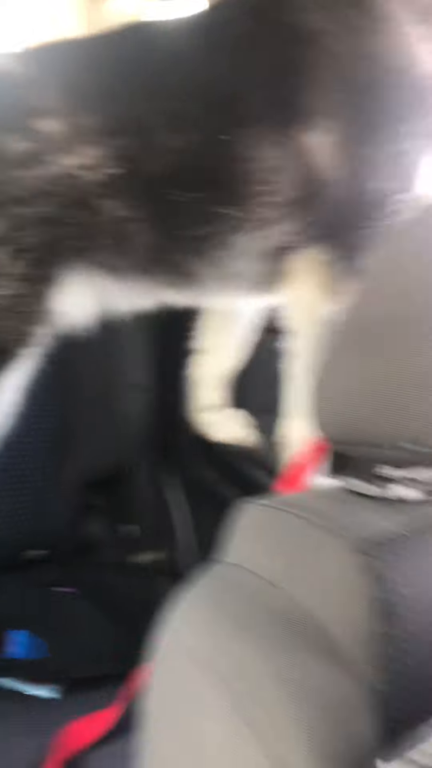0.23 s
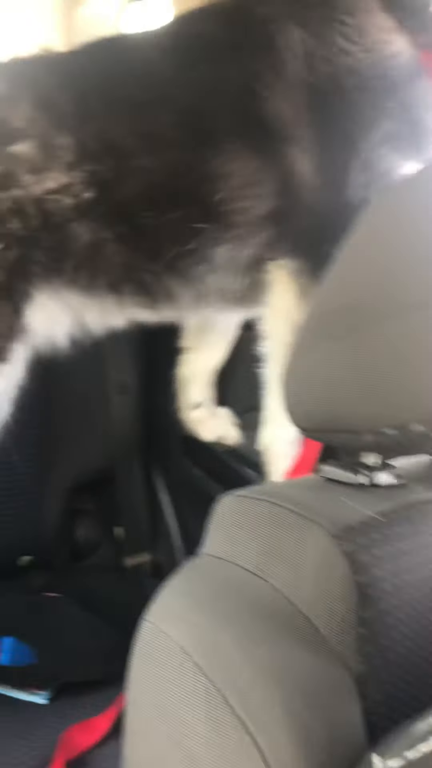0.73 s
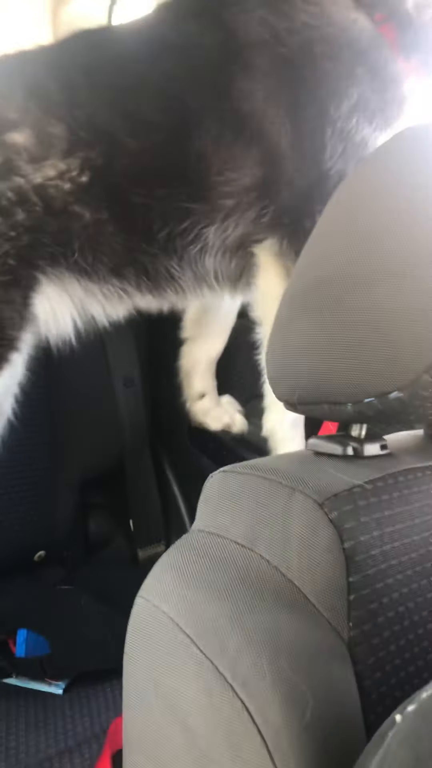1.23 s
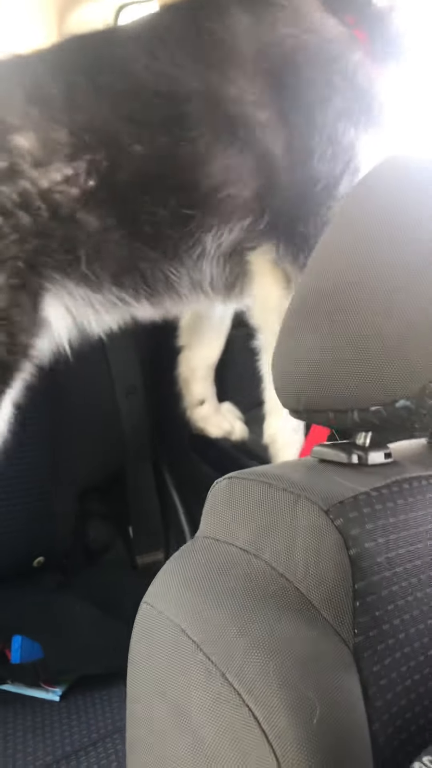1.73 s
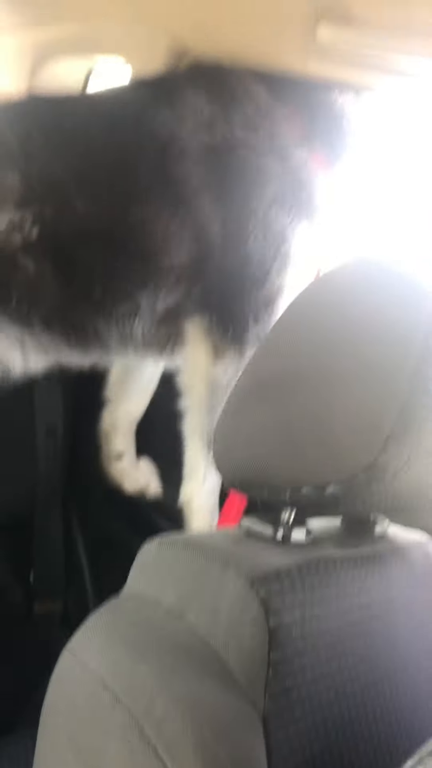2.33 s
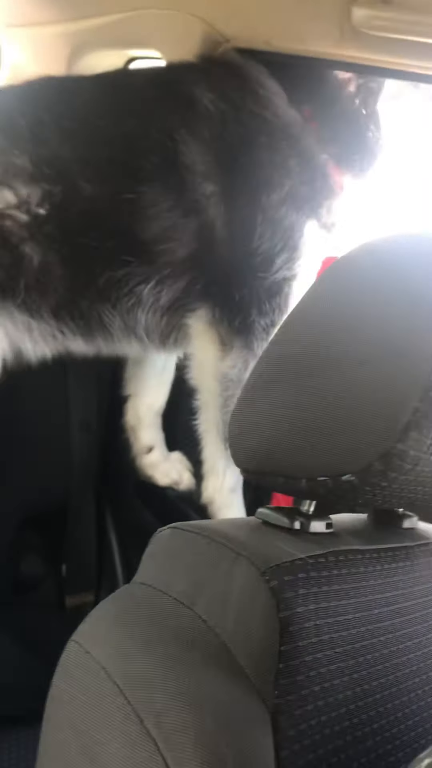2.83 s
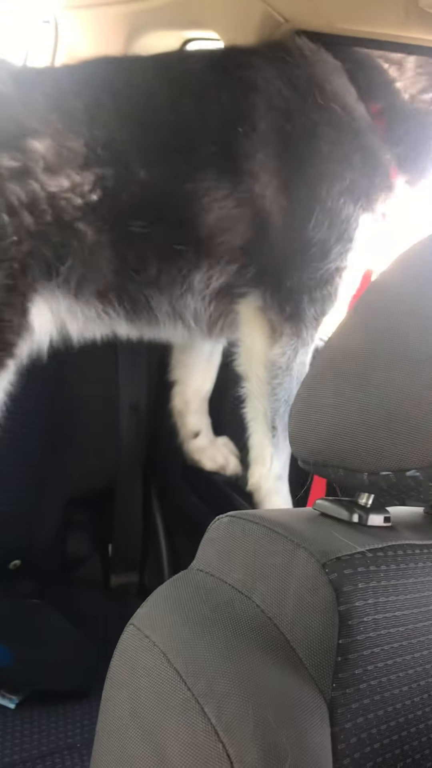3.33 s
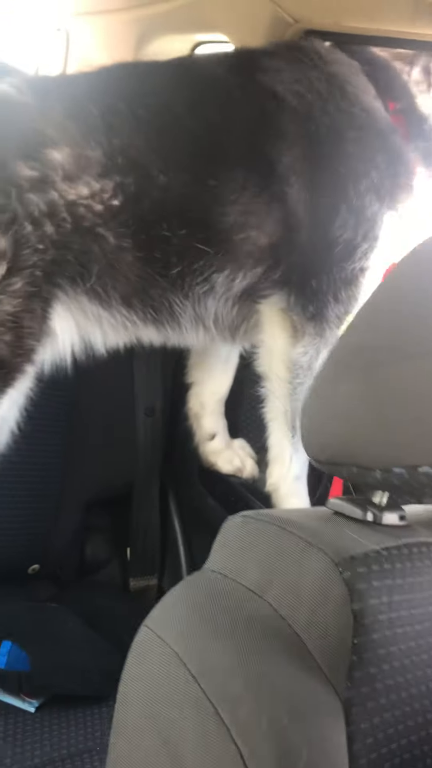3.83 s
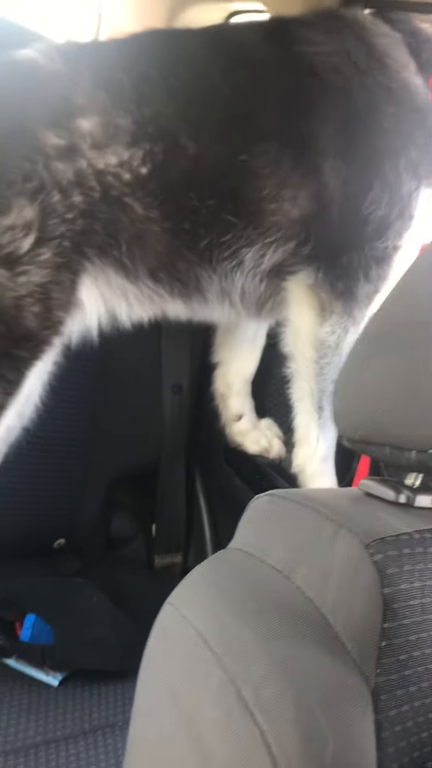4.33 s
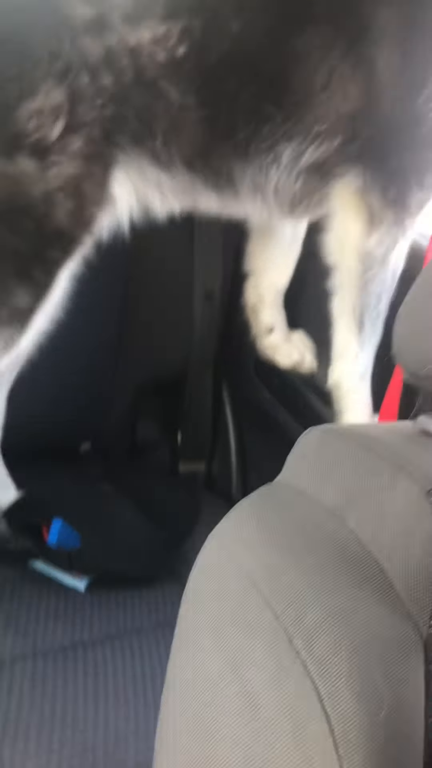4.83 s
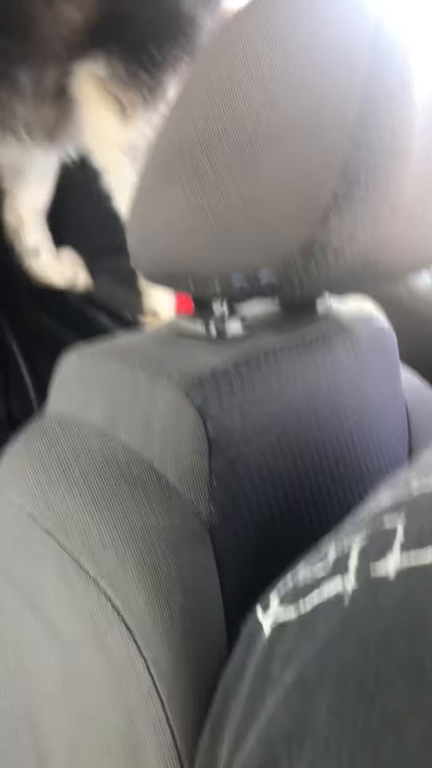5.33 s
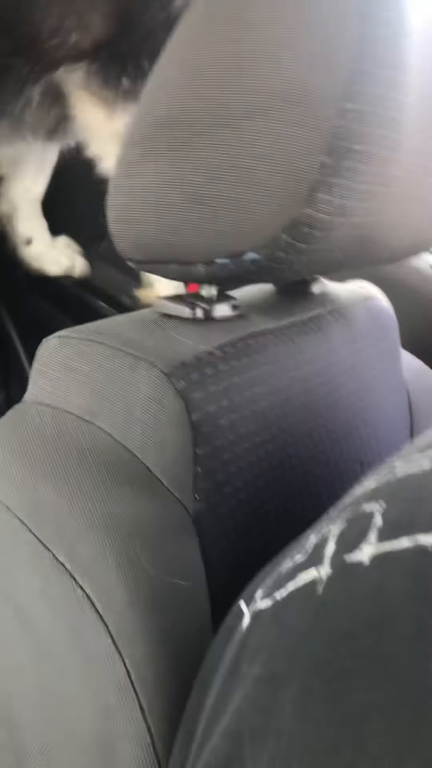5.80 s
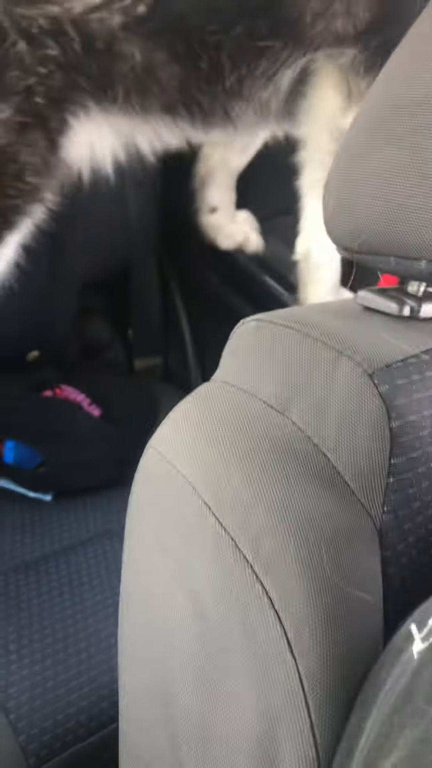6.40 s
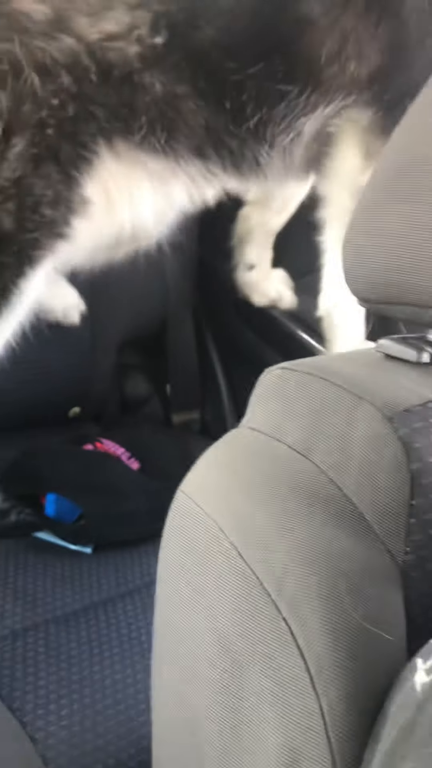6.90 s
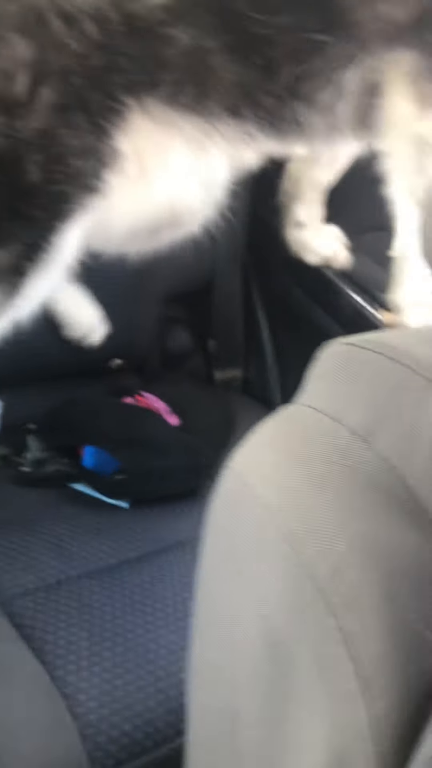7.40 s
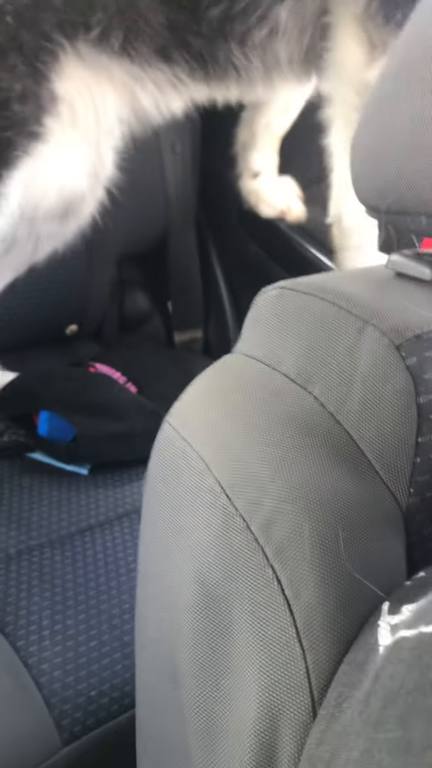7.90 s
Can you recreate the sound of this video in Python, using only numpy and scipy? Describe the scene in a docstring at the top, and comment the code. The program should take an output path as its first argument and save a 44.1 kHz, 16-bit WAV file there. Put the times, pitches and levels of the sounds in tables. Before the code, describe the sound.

A car's cabin rumble eases, then booms as it accelerates, while fur brushes the seat and plastic buckles knock close by.

```python
"""Dog in a moving car

Microphone between the seats. The car slows on a rough road, then pulls away, its engine booming in
the cabin. Tyres rumble and hiss with the speed, and a wheel thuds over bumps. Close by, a dog stands
on the back seat: fur rustles on cloth, and harness and belt fittings click and knock."""
import sys
import numpy as np
from scipy import signal
from scipy.fft import rfft, irfft, next_fast_len
from scipy.io import wavfile
from scipy.ndimage import map_coordinates

SR = 44100
rng = np.random.default_rng(int(sys.argv[2]) if len(sys.argv) > 2 else 0)


def digitize_waveform(pressure):
    """Quantize a signal to 16-bit integers and store it at the path in sys.argv[1].

    Rows of a 2-D input are taken as channels; values are limited to [-1, 1].
    """
    field = np.atleast_2d(pressure).T
    bounded = np.clip(field, -1, 1)
    quanta = np.round(bounded * 32767).astype(np.int16)
    wavfile.write(sys.argv[1], SR, quanta)


N = 359415
TIME = np.arange(N) / SR

# engine firing rate: t/s, f/Hz
FIRING_RATE = [(0,40.53),(1.2,41.92),(1.65,38.84),(3,35.59),(4.75,33.8),(5.42,35.5),(5.8,45.13),(6.03,52.23),(6.25,55.3),(6.55,57.3),(6.85,64.3),(7.2,66.95),(7.6,70.65),(8.15,75.53)]
# throttle pressed: start/s, end/s, depth/0-1
THROTTLE = [(0.293,.65,1),(1.047,1.4,0.64),(5.45,8.5,0.89)]
# engine overtones: multiple of the firing rate, relative level/dB
ENGINE_ORDERS = [(1.5,-18.5),(2,-2.5),(2.5,-27),(3,-12.5),(3.5,-15.5),(4,-16),(4.5,-19.5),(5,-22),(6,-25),(7,-28.5)]
# cabin air resonances that lift a passing engine tone: f/Hz, half width/Hz, lift/dB
CABIN_MODES = [(56.8,5.9,4.5),(133.8,8,6.5),(168.8,5.6,12),(271,10,3)]

# road speed: t/s, share of the opening speed
ROAD_SPEED = [(0,0.99),(1.9,0.91),(3,0.67),(4,0.5),(5.1,0.4),(6.2,0.47),(7.2,0.58),(8.15,0.57)]
# rough stretches: t/s, half length/s, shake lift/dB, panel lift/dB
ROUGH_ROAD = [(.2,0.28,2,-1),(1.4,0.24,7,4.5),(2.046,0.15,1,3.5),(2.593,0.32,9,4.5),(3.456,0.21,4,2.5),(5.147,0.16,-1,1.5),(5.75,0.83,8.5,0.5),(7.1,0.6,3.5,2)]
# dips that set the body booming, and bumps under a wheel: t/s, half length/s, level/dB
DIPS = [(.55,0.2,-30.5),(2.05,0.16,-25),(2.3,0.25,-29),(2.6,0.14,-25.5)]
BUMPS = [(.29,0.025,-35.5),(1.04,0.031,-40),(1.24,0.046,-38),(1.435,0.014,-46),(2.04,0.021,-38),(2.087,0.013,-28),(3.42,0.043,-43.5)]
# road noise spectra, from inside the car: f/Hz, relative level/dB
SUSPENSION_SPECTRUM = [(15,-39),(24,-10.5),(30,-2),(42,-10),(52,4),(63,-6),(80,-10.5),(130,-33.5),(300,-83)]
PANEL_SPECTRUM = [(45,-29.5),(70,-0.5),(90,-1.5),(104,2.5),(118,-3),(135,-5.5),(165,-11),(260,-36),(600,-87)]
BODY_SPECTRUM = [(110,-36),(160,-1),(185,6),(230,-3.5),(270,-3.5),(350,-9.5),(450,-19),(700,-32.5),(2000,-90)]
TYRE_SPECTRUM = [(200,-14.5),(450,2),(590,1.5),(760,0),(1000,-2),(1150,-1.5),(1350,-2.5),(1650,-7),(2500,-17),(4000,-30),(8000,-34.5),(16000,-43)]
THUD_SPECTRUM = [(50,-18),(100,7.5),(180,-7),(260,5.5),(400,-3),(600,-9),(850,-13),(1300,-32),(4000,-75.5)]
# whining bands of the tread: f/Hz, width/Hz, level against the hiss/dB
TREAD_BANDS = [(503,35,-16.5),(742,40,-14),(1327,70,-21)]

# steady rustle as the dog grows restless: t/s, level/dB
RESTLESSNESS = [(0,-72),(4.6,-69),(5.8,-60),(6.2,-65),(6.7,-59),(7.05,-59.5),(7.37,-54.5),(7.56,-57.5),(8.15,-63.5)]
# fur brushes on cloth: t/s, half length/s, relative level/dB
FUR_STROKES = [(.39,0.15,-62),(.69,0.033,-56),(1.08,0.058,-61),(1.48,0.18,-58.5),(2.21,0.059,-60.5),(2.48,0.083,-63),(3.04,0.052,-64),(3.6,0.033,-70),(4.97,0.053,-62.5),(5.39,.024,-57),(5.885,0.012,-50.5),(6.52,0.023,-56),(6.78,0.012,-46.5),(6.87,0.027,-51.5),(7.44,0.023,-47.5),(7.485,0.02,-40)]
# a strap slides, and the seat is scuffed: t/s, half length/s, level/dB
STRAP_SLIDES = [(5.25,0.0055,-67),(5.38,0.039,-46.5),(5.595,0.0053,-33.5),(5.608,.003,-37),(7.49,0.015,-53),(7.703,0.014,-43)]
SEAT_SCUFFS = [(4.825,0.017,-52.5),(5.6,0.19,-51),(6.8,0.03,-51.5)]
# rubbing spectra, close by: f/Hz, relative level/dB
CLOTH_SPECTRUM = [(300,-19.5),(750,9.5),(1500,-3),(2200,3),(3000,2),(4300,2),(5000,-1.5),(6600,-1),(7800,-5.5),(9500,-4),(10400,-10.5),(11500,-5.5),(15800,-11.5)]
WEBBING_SPECTRUM = [(400,2),(880,1.5),(1200,-4.5),(1850,3),(2200,-5.5),(2600,-0.5),(3300,-2.5),(4300,-8),(8000,-27.5),(16000,-33.5)]
SEAT_SPECTRUM = [(300,-21.5),(550,-8.5),(800,-3),(1100,-8),(2000,-18),(6000,-39)]

# hollow contacts: t/s, relative level/dB, clack/dB, most excited f/Hz, fall around it/dB per octave
KNOCKS = [(1.42,-36.5,7,1388,10),(4.365,-43,5,1872,7),(4.522,-43,0,2430,14),(5.155,-35.5,-16,2447,25),(5.259,-32.5,-6,2080,10),(5.346,-30,-20,2487,22),(5.365,-29,-21,2400,12),(5.511,-24,-10,1660,10),(5.542,-23,-4,1640,14),(5.548,-22,-5,1870,25),(5.555,-12.5,-15,1900,28),(5.565,-22,-3,1670,20),(5.576,-4.5,-21,2440,6.5),(5.668,-31.5,-24,2220,3),(7.1613,-23.5,-12,1820,12),(7.254,-22.5,-1,1660,6),(7.507,-22,-5,1800,6),(7.687,-26,-22,1872,10),(7.702,-25,-24,2400,8),(7.763,-30,-16,2380,26)]
# brief crack of a knock: f/Hz, relative level/dB
CRACK_SPECTRUM = [(400,-20),(1000,-9),(1600,4),(2600,3),(4300,0),(6000,-5),(8300,-7.5),(10500,-16),(16000,-23)]
# sharp contacts, all levels relative: t/s, level/dB, low band/dB, top band/dB
CLICKS = [(0.0783,-43,1,-24),(0.109,-41,6,-26),(0.2472,-34,11,-11),(.2809,-37,9,-22),(.313,-30.5,9,-14),(.456,-35,12,-20),(0.527,-30,8.5,-15),(.596,-41,4,-16),(0.7552,-38.5,10,-18),(.8892,-43,5,-26),(.9264,-43,8,-26),(1.6172,-30.5,-0.5,-11),(2.966,-37,12.5,-25),(5.2444,-38.5,8,-5),(5.3155,-30,-8,-24),(5.4613,-14.5,-9.5,-13),(5.614,-24,-6,-10.5),(5.696,-40,-3,-21),(5.7297,-19,2,-10),(5.9385,-35.5,-1,-20),(5.963,-30.5,0,-17),(6.0028,-36.5,3,-3.5),(6.298,-37,-5,-27),(6.55,-31,-4,-14),(6.5834,-28.5,-6.5,-11),(7.1618,-31.5,-10,-4),(7.528,-34,-1,-30),(7.713,-36,-21,-16)]
# modes of the plastic fitting and the metal ring: f/Hz, relative level/dB, t60/s
PLASTIC_MODES = [(900,-6,.06),(1320,-10,0.048),(1645,-2.5,0.038),(1893,0,0.027),(2070,-8,.03),(2330,-16,.025),(2445,-1,0.032),(2610,3.5,0.015),(2910,-14,.05),(3440,-10,.035),(4200,-19,0.023),(4300,-23,0.022),(5430,-13,0.023),(6600,-17,0.02)]
METAL_MODES = [(6595,-3,.09),(8830,-1,0.093),(11880,-10,.07)]


def engine(idle_db=-32.5, load_db=10, lag_s=0.13, idle_hz=35, overtone_db=-48.5, db_per_octave=12):
    """From the cabin: the firing tone swells with the throttle; uneven cylinders add wavering orders."""
    firing_hz = curve(FIRING_RATE)
    phase = 2 * np.pi * np.cumsum(firing_hz) / SR
    pedal = sum(depth * ((TIME > start) & (TIME < end)) for start, end, depth in THROTTLE)
    pole = np.exp(-1 / (lag_s * SR))
    load = signal.lfilter([1 - pole], [1, -pole], pedal)
    lift_db = lambda hz: sum(db * bell(hz, mode_hz, half) for mode_hz, half, db in CABIN_MODES)
    boom = amp(idle_db + load_db * load + lift_db(firing_hz) + 1.5 * wobble(21)) * np.sin(phase)
    overtones = np.zeros(N)
    for order, db in ENGINE_ORDERS:
        gain = amp(db + lift_db(order * firing_hz) + 2.5 * wobble(9))
        overtones += gain * np.sin(order * phase + rng.uniform(0, 2 * np.pi))
    rev_gain = amp(overtone_db + db_per_octave * np.log2(firing_hz / idle_hz))
    return np.sqrt(2) * (boom + rev_gain * overtones)


def road(boom_hz=51, body_share=0.11):
    """Underneath: the road shakes the suspension, drums on the panels and hisses under the tread."""
    shake_lift_db = sum(db * bell(TIME, s, half) for s, half, db, _ in ROUGH_ROAD)
    panel_lift_db = sum(db * bell(TIME, s, half) for s, half, _, db in ROUGH_ROAD)
    shake = amp(speed_db(-31, per_doubling=3.5) + shake_lift_db) * noise(SUSPENSION_SPECTRUM)
    boom_phase = 2 * np.pi * np.cumsum(boom_hz + 2 * wobble(14.9)) / SR  # a wandering body resonance
    boom = swells(DIPS) * np.sqrt(2) * np.sin(boom_phase)
    panels = amp(speed_db(-29.5, per_doubling=3.5) + panel_lift_db) * noise(PANEL_SPECTRUM)
    drone_db = speed_db(-34, per_doubling=5.5) + body_share * panel_lift_db + 1.38 * wobble(9)
    drone = amp(drone_db) * noise(BODY_SPECTRUM)
    hiss_db = speed_db(-46, per_doubling=10) + 0.84 * wobble(16)
    tyres = amp(hiss_db) * (noise(TYRE_SPECTRUM) + tread_whine())
    thuds = swells(BUMPS) * noise(THUD_SPECTRUM)
    return shake + boom + panels + drone + tyres + thuds


def tread_whine(flutter_db=5):
    """The tread sings faintly in a few narrow, fluttering bands."""
    out = np.zeros(N)
    for centre, width, db in TREAD_BANDS:
        gain = amp(db + flutter_db * wobble(7.9))
        out += gain * unit(filtered(rng.standard_normal(N), lambda hz: bell(hz, centre, width / 2)))
    return out


def rubbing(fibre_db=2, slip_db=3, grip_db=1.15, fidget_db=1.9, catches_per_s=45, catch_s=0.0037):
    """Back seat, close: fur brushes cloth in fine grains and catches; a strap slides in coarser slips."""
    pressure = amp(curve(RESTLESSNESS) + fidget_db * wobble(9.7)) + amp(-5) * swells(FUR_STROKES)
    pressure *= amp(grip_db * wobble(35))
    fibres = unit(noise(CLOTH_SPECTRUM) * amp(fibre_db * wobble(600)))
    snags = (rng.random(N) < catches_per_s / SR) * rng.random(N)
    snag_decays = signal.lfilter([1], [1, -np.exp(-1 / (catch_s * SR))], snags)
    catches = amp(-10) * unit(snag_decays * noise(WEBBING_SPECTRUM))
    strap = swells(STRAP_SLIDES) * unit(noise(WEBBING_SPECTRUM) * amp(slip_db * wobble(250)))
    scuffs = swells(SEAT_SCUFFS) * noise(SEAT_SPECTRUM)
    return pressure * (fibres + catches) + strap + scuffs


def knocks(level_db=-8.5, attack_s=0.0011, crack_t60=0.036, clack_t60=0.055, grip_s=0.0085):
    """Close: a hollow plastic fitting rings differently with each knock, over a crack and a low clack."""
    out, t = np.zeros(N), np.arange(SR // 6) / SR
    onset = 1 - np.exp(-t / attack_s)
    grip = amp(-7.5 * (1.5 - np.exp(-t / grip_s)))  # the strap soon soaks up the first swing
    clack_spectrum = [(400, -29), (900, -3.5), (1600, -23), (4000, -45)]
    for s, db, clack_db, centre_hz, db_per_octave in KNOCKS:
        # the point of contact favours the modes near one frequency
        fall_db = lambda hz: db_per_octave * abs(np.log2(hz / centre_hz))
        ring = np.zeros(len(t))
        for hz, mode_db, t60 in PLASTIC_MODES:
            strength_db = mode_db - fall_db(hz) + rng.normal(0, 1)
            ring += amp(strength_db - 60 * t / t60) * np.sin(2 * np.pi * hz * t + rng.normal(0, 1))
        colour = [(hz, band_db - 0.29 * fall_db(hz)) for hz, band_db in CRACK_SPECTRUM]
        crack = amp(-12.5 - 60 * t / crack_t60) * noise(colour, len(t))
        clack = amp(clack_db - 60 * t / clack_t60) * noise(clack_spectrum, len(t))
        add(out, s, amp(db + level_db) * onset * (2 * grip * ring + crack + clack))
    return out


def clicks(contacts, level_db=-7, attack_s=0.00073, snap_db=6, snap_t60=0.0049, ring_t60=0.062):
    """Small hard contacts: a brief snap, then dense, quickly damped modes, heard as coloured noise."""
    out, t = np.zeros(N), np.arange(SR // 6) / SR
    onset = 1 - np.exp(-t / attack_s)
    fade = amp(-60 * t / ring_t60) + amp(snap_db - 60 * t / snap_t60)
    for s, db, low_db, top_db in contacts:
        low, top = low_db - 1, top_db - 4
        colour = [(300, low - 15), (620, low - 4), (860, low + 7), (1300, low), (2400, low / 5),
                  (3900, -2.5), (5000, -7.5), (5600, -10), (6600, -10.5), (7400, -13),
                  (9600, top), (10400, top - 8), (11500, top - 1), (15000, top - 6)]
        add(out, s, amp(db + level_db) * onset * fade * noise(colour, len(t)))
    return out


def trim_ticks(per_s=6.2, scatter_db=0.5, low_db=4.5, top_db=-23):
    """Loose trim ticks faintly at random, louder at speed; gives rows like CLICKS."""
    level_db = speed_db(-48.5, per_doubling=17) + scatter_db * rng.standard_normal(N)
    hits = np.flatnonzero(rng.random(N) < per_s / SR)
    return [(TIME[i], level_db[i], low_db, top_db) for i in hits]


def harness_ring(start_s=5.613, level_db=-44):
    """A small metal ring on the harness is struck once and sounds thinly."""
    out, t = np.zeros(N), np.arange(SR // 4) / SR
    for hz, db, t60 in METAL_MODES:
        add(out, start_s, amp(level_db + db - 60 * t / t60) * np.sin(2 * np.pi * hz * t))
    return out


def cabin(x, t60=0.11, wet_db=-13, gap_s=0.003):
    """Windows and trim near the microphone give a very short tail."""
    t = np.arange(SR // 5) / SR
    tail = rng.standard_normal(len(t)) * amp(-60 * t / t60) * (t > gap_s)
    return x + amp(wet_db) * signal.fftconvolve(x, tail / np.linalg.norm(tail))[:N]


def speed_db(opening_db, per_doubling):
    """A level that gains per_doubling dB each time the road speed doubles."""
    return opening_db + per_doubling * np.log2(curve(ROAD_SPEED) + 1e-6)


def amp(db):
    """Decibels to gain."""
    return 10 ** (np.asarray(db) / 20)


def unit(x):
    """Scale to rms 1."""
    return x / np.sqrt(np.mean(x ** 2) + 1e-20)


def curve(rows):
    """One value per sample from rows of t/s, value."""
    return np.interp(TIME, *np.transpose(rows))


def wobble(rate):
    """A smooth random curve, rate knots a second."""
    return map_coordinates(rng.standard_normal(int(N * rate / SR) + 4), [TIME * rate])


def filtered(x, response):
    """Filter x by a gain that depends on frequency."""
    size = next_fast_len(len(x) + 8192)
    return irfft(rfft(x, size) * response(np.fft.rfftfreq(size, 1 / SR)), size)[:len(x)]


def noise(spectrum, size=N):
    """Noise of rms 1, coloured by rows of f/Hz, level/dB on a log frequency axis."""
    points_hz, db = np.transpose(spectrum)
    response = lambda hz: amp(np.interp(np.log(hz + 1), np.log(points_hz), db))
    return unit(filtered(rng.standard_normal(size), response))


def bell(x, centre, half):
    """A bell curve of height 1."""
    return np.exp(-.5 * ((x - centre) / half) ** 2)


def swells(rows):
    """Gain of bell-shaped swells from rows of t/s, half length/s, level/dB."""
    return sum(amp(db) * bell(TIME, s, half) for s, half, db in rows)


def add(track, s, sound):
    """Mix a sound into the track at time s."""
    part = track[max(round(s * SR), 0):][:len(sound)]
    part += sound[:len(part)]


def scene():
    """One microphone between the seats: the drive all around, the dog and fittings close by."""
    drive = engine() + road()
    close = rubbing() + knocks() + harness_ring() + clicks(CLICKS + trim_ticks())
    return (drive + cabin(close))[None]


def record(dry, top_hz=15870, edge_hz=400):
    """The phone keeps nothing above its band limit."""
    passband = lambda hz: np.clip((top_hz - hz) / edge_hz + .5, 0, 1)
    return np.array([filtered(channel, passband) for channel in dry])


dry = scene()
out = record(dry)
digitize_waveform(out)
```